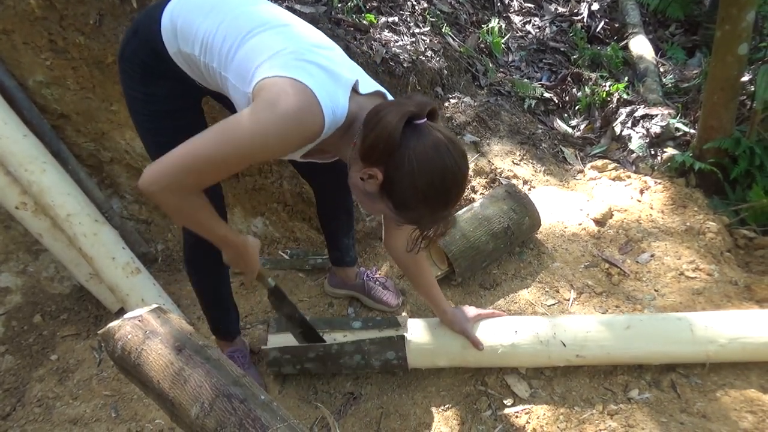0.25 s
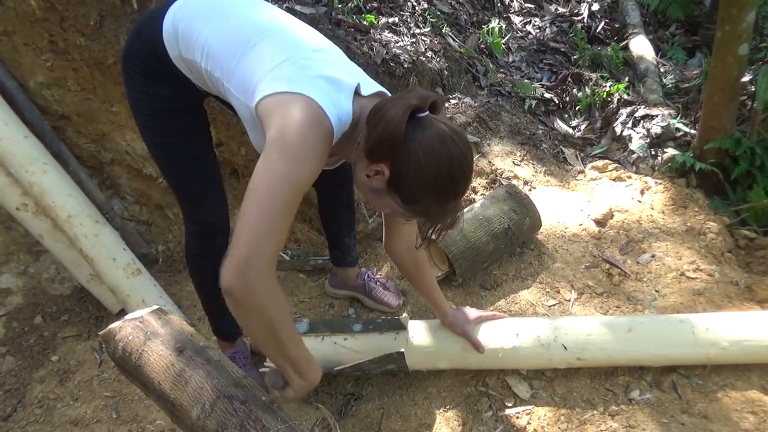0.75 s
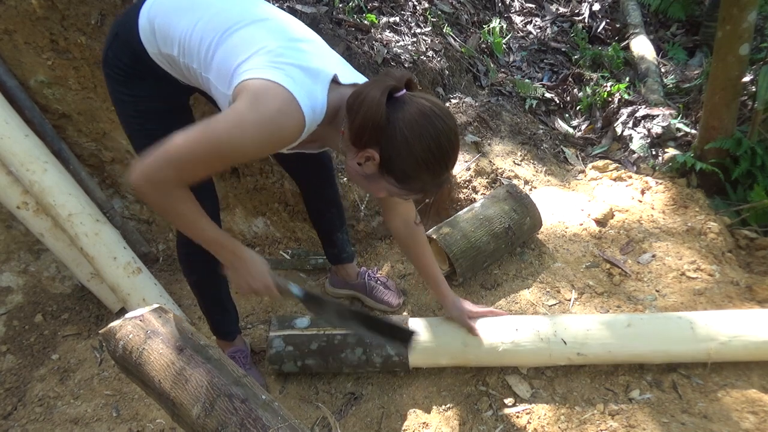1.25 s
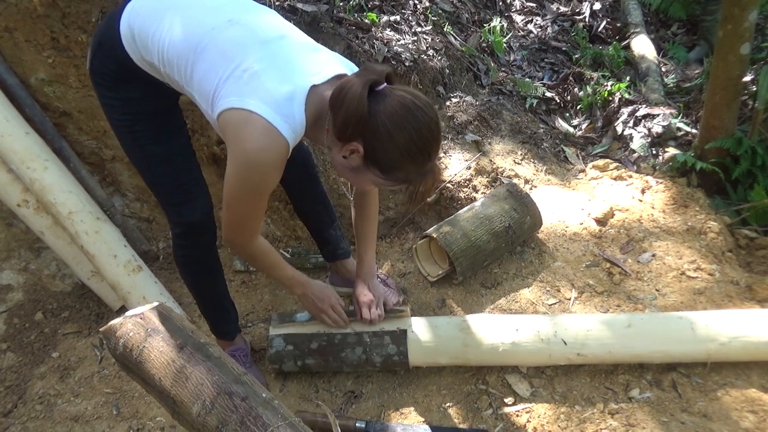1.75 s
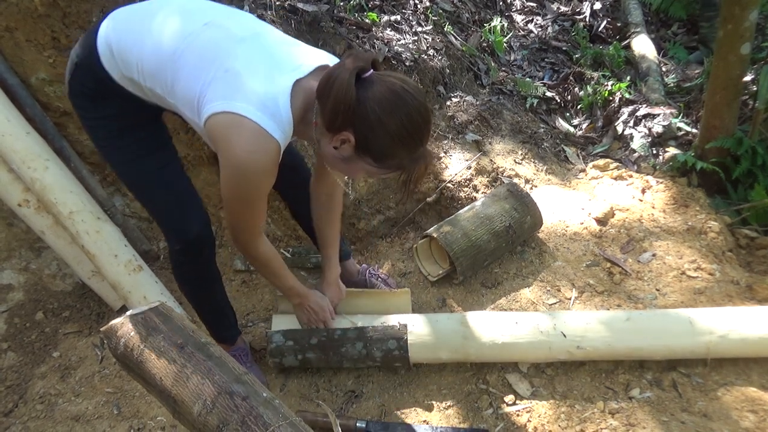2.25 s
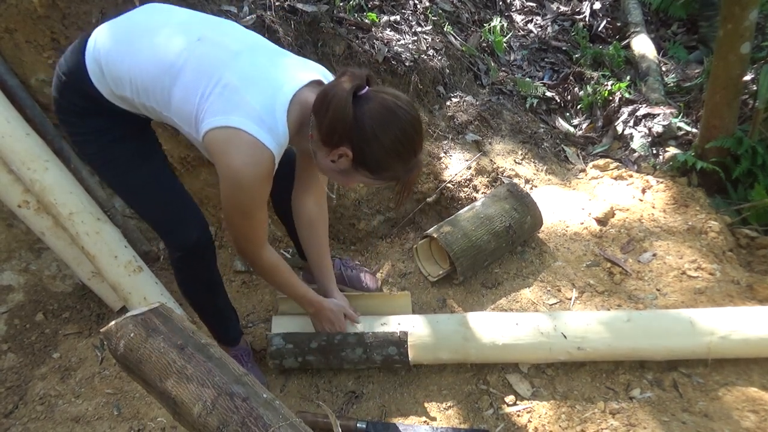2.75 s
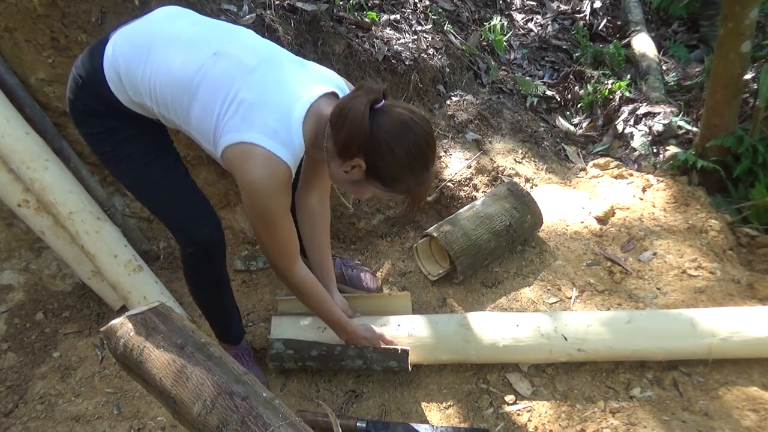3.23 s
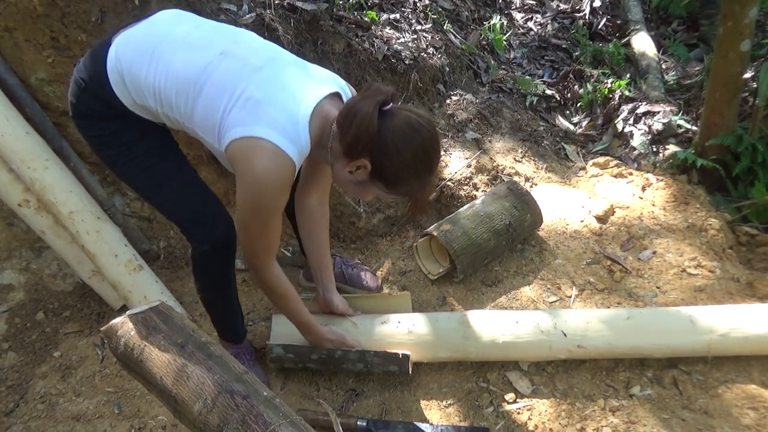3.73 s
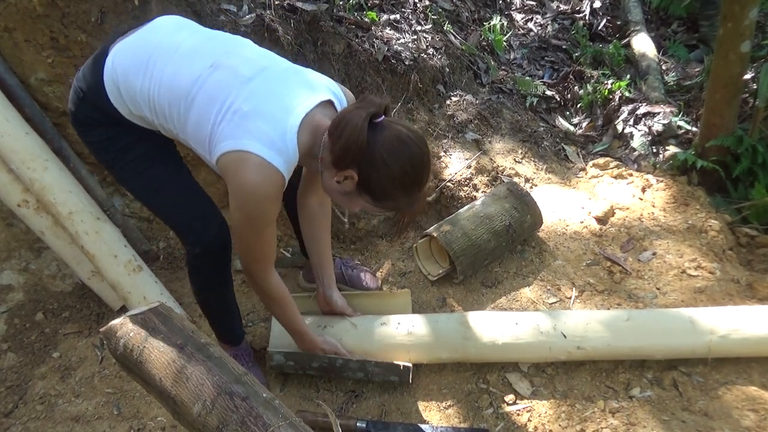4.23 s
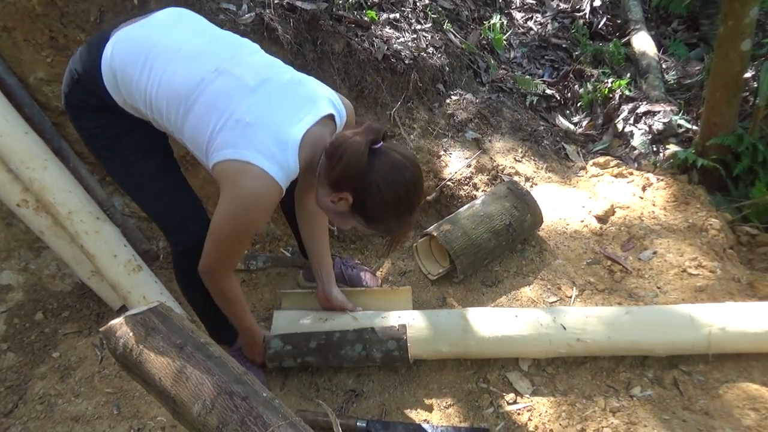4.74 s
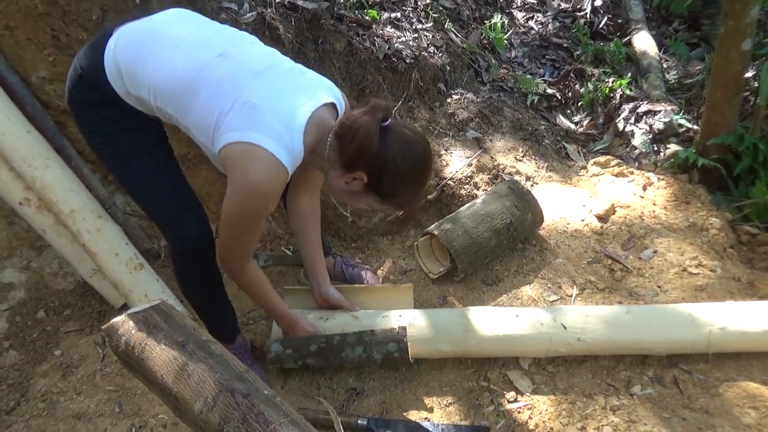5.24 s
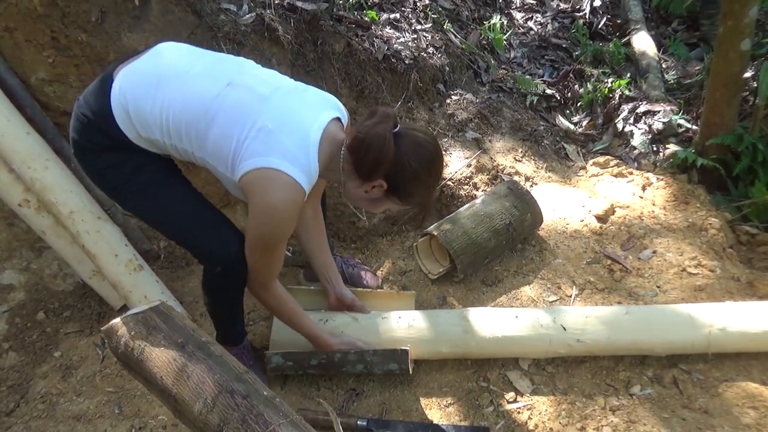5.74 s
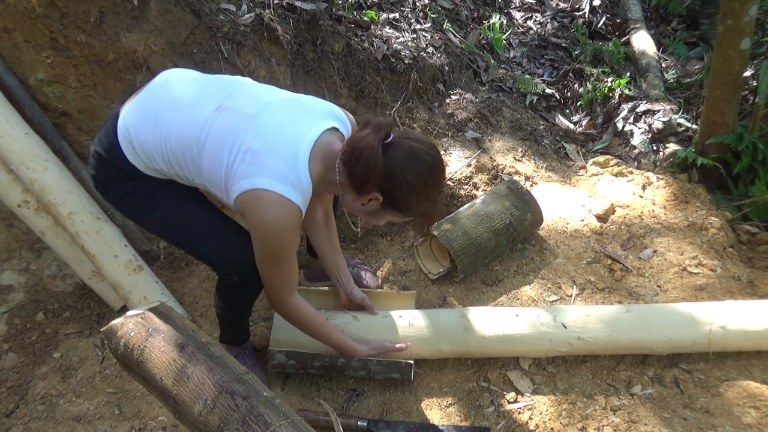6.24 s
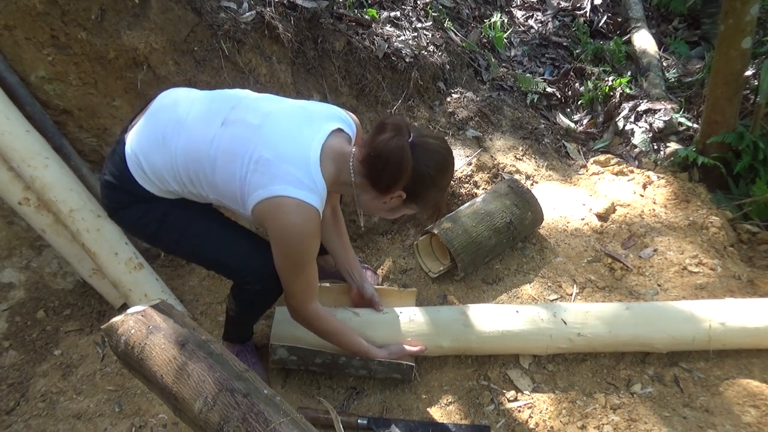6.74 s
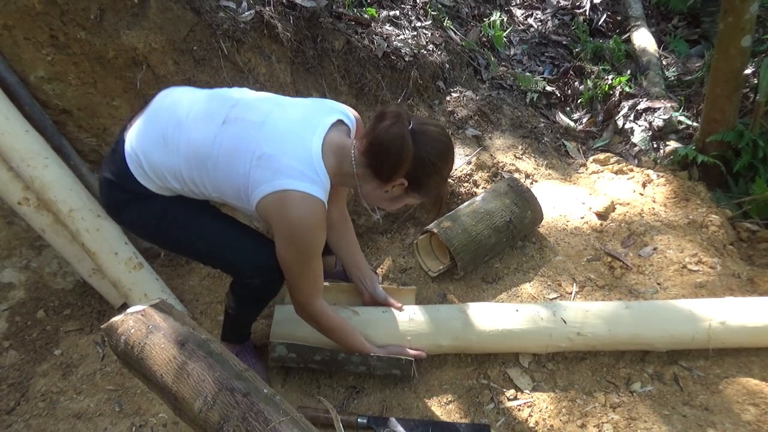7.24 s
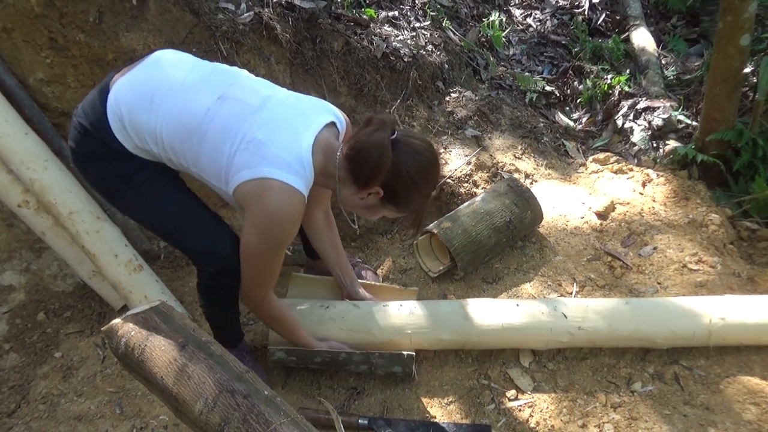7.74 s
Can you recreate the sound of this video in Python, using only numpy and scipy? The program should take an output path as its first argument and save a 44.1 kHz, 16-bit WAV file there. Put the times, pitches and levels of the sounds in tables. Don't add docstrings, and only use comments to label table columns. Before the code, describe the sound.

Close to a fresh log in a forest clearing, a blade rubs under bark, hisses free and drops with a bright metallic clatter. Hands then pull the bark: fibres crackle, rasp in short bursts, rip in a sharp double jolt and snap hard, with hollow knocks. Faint insects, leaves and far bird peeps sit behind. Small camera microphone, nearly mono, dry and bright.

```python
import sys
import numpy as np
from scipy import signal
from scipy.fft import rfft, irfft, next_fast_len
from scipy.io import wavfile
from scipy.ndimage import uniform_filter1d, map_coordinates

SR = 44100
rng = np.random.default_rng(int(sys.argv[2]) if len(sys.argv) > 2 else 0)


def ratio_of_db(decibels):
    return 10 ** (np.asarray(decibels, float) / 20)


def dump(signal):
    limited = np.clip(np.atleast_2d(signal).T, -1, 1)
    pcm = np.round(limited * 32767).astype(np.int16)
    wavfile.write(sys.argv[1], SR, pcm)


N = 351904


def peeling():
    # (frequency [Hz], level [dB])
    fibre_curve = [(300, -70), (3000, -16), (4300, -12), (5500, -4), (6500, 1.5), (8500, 0.5),
                   (11000, -1.5), (13000, -5), (15500, -12), (17000, -37)]
    # (start [s], end [s], centre [Hz], width [Hz], level [dB])
    hollows = [(0, 0.765, 2640, 120, 0.5), (0.187, 0.283, 5570, 1500, 12), (2.87, 3.12, 6200, 1510, 10.5),
               (2.776, 3.183, 1170, 392, 7.5), (3.41, 3.888, 1135, 395, 7), (2.84, 3.898, 666, 139, -4),
               (2.81, 3.596, 2438, 303.1, -4.5), (4.15, 4.723, 1980, 413, -0.5),
               (4.185, 4.584, 1090, 220, 5), (5.15, 5.638, 785, 348, -1.5), (5.152, 5.65, 2620, 250, -2.5),
               (5.2, 6.71, 1250, 199, -9), (5.7, 6.307, 580, 150, -1), (5.976, 6.28, 2440, 120, 7),
               (6.378, 6.926, 1965, 260, 5), (6.762, 6.94, 5100, 500, 7), (6.925, 7.973, 625, 120, 9.5),
               (7.306, 7.598, 1614, 402.9, -3)]
    # (start [s], peak [s], end [s], rasp [dB], bark body over rasp [dB])
    sweeps = [(-.06, .003, 0.064, -46.5, -6.5), (.36, .39, 0.46, -55.5, 4), (.53, .58, 0.69, -44.5, -4),
              (.57, .69, .79, -42, -7.5), (3.08, 3.17, 3.25, -36.5, -9), (3.41, 3.52, 3.593, -32, -9),
              (3.66, 3.72, 3.75, -40.5, -13), (3.73, 3.87, 3.94, -34.5, -9.5),
              (3.89, 3.95, 3.98, -45.5, -7.5), (4.04, 4.075, 4.18, -40.5, -13),
              (4.14, 4.27, 4.443, -37.5, -9.5), (4.4, 4.43, 4.4, -40.5, -12),
              (4.5, 4.55, 4.69, -47.5, -1.5), (5.16, 5.29, 5.4, -46.5, -1), (5.44, 5.53, 5.6, -36.5, -5.5),
              (5.67, 5.77, 5.93, -40.5, -9), (6.14, 6.175, 6.205, -33, -11),
              (6.49, 6.507, 6.57, -37.5, -13.5), (6.73, 6.87, 6.96, -39, -17),
              (7.77, 7.93, 8.17, -38.5, -13.5)]
    # (start [s], peak [s], end [s], rasp [dB], bark body over rasp [dB])
    pushes = [(.13, .22, 0.69, -58, -5), (.8, .86, 0.97, -60.5, 4), (1.48, 1.74, 2.09, -54, -1.5),
              (2.12, 2.38, 2.45, -55.5, 4), (2.4, 2.6, 2.77, -54.5, -0.5), (2.78, 2.91, 3.03, -40, -5.5),
              (2.91, 3.03, 3.23, -39, -8.5), (3.3, 3.37, 3.1, -51.5, -3.5), (4.62, 4.85, 5.5, -63, 2),
              (5.33, 5.43, 5.64, -45, -4.5), (5.54, 5.61, 5.78, -42.5, -6.5), (5.88, 6.06, 6.25, -42, -9),
              (6.12, 6.25, 6.71, -42, -8), (6.55, 6.645, 6.94, -39.5, -12), (6.93, 6.968, 7.035, -35, -12),
              (7.0, 7.03, 7.08, -55, -12), (7.32, 7.36, 7.55, -42, -15), (7.39, 7.58, 8.06, -42, -12.5)]
    # (start [s], peak [s], end [s], rasp [dB], bark body over rasp [dB])
    jolts = [
        (4.46, 4.478, 4.487, -20.5, -17),
        (4.487, 4.502, 4.507, -16.5, -16),
        (4.45, 4.49, 4.525, -26, -8),
    ]

    rows = blended(np.concatenate([
        strokes(sweeps, squareness=1.74, air_db=-4.5, gained_db=0.92),
        strokes(pushes, squareness=2.32, air_db=-7.5, gained_db=1.5),
        strokes(jolts, squareness=1.1, air_db=-5, gained_db=.3)], axis=1))
    friction = grit(rate=4000, spread_db=1.5, share=0.62)
    hz, t, z = signal.stft(friction, SR, nperseg=512, noverlap=384)
    _, air_db, body_db = curves(rows, t)
    f = hz[:, None]

    top_tilt = np.clip((f - 8500) / 4500, -.3, 1.3)
    rasp = ratio_of_db(along(fibre_curve, f) + (air_db + 7) * top_tilt)

    body = .36 * np.abs(resonance(f, 1400, 3400)) ** 2
    for start, end, centre_hz, width, db in hollows:
        held = np.clip(np.minimum(t - start, end - t) / 0.019, 0, 1)
        body = body + held * ratio_of_db(db - 6.5) * np.abs(resonance(f, centre_hz, 1.04 * width)) ** 3.6

    patches = uniform_filter1d(rng.standard_normal(z.shape), size=10, axis=0)
    patches = unit(uniform_filter1d(patches, size=14, axis=1))
    gain = np.hypot(rasp, ratio_of_db(body_db + 9) * body) * ratio_of_db(1.72 * patches + 4)
    sound = signal.istft(z * gain, SR, nperseg=512, noverlap=384)[1][:N]
    level_db = curves(rows, np.arange(N) / SR)[0]
    return sound * ratio_of_db(level_db + 1.15 * wobble(40))


def snaps():
    # (time [s], peak [dB], knock over crack [dB], crack [Hz], knock [Hz])
    thick = [(0.383, -27.5, -14, 7940, 1540), (1.8698, -35, -4, 9240, 2700),
             (2.1647, -25.5, -15, 9100, 1350), (2.172, -26, -16, 7050, 647), (2.2084, -18, -8, 5200, 1280),
             (2.232, -22.5, -10, 9000, 950), (2.2438, -21.5, -13, 6600, 724),
             (2.2694, -23.5, -11, 6640, 800), (2.3484, -24, -16, 12600, 1180), (2.36, -9, -14, 6600, 2240),
             (2.3664, -23, -15, 6700, 1620), (4.4752, -14, -13.5, 11600, 1920),
             (5.3849, -28, -4.5, 7870, 800.5), (5.5413, -3.5, -23, 12100, 980),
             (6.9368, -11.5, -17.5, 6500, 1890), (6.9434, -15, -15, 6430, 670),
             (7.9354, -21, -19, 8800, 1910)]
    # (time [s], peak [dB], knock over crack [dB])
    thin = [(0.21, -38.5, -9), (0.3984, -35, -23), (0.4284, -29, -33), (1.8916, -33, -21),
            (1.957, -34, -14), (1.9904, -30, -11), (2.1131, -29, -30), (2.216, -26, -17),
            (2.3171, -42, -30), (2.3391, -31, -22), (2.3553, -23, -17), (3.7179, -23, -21),
            (4.0517, -29, -17.5), (5.2919, -25, -12.5), (5.4964, -28, -15), (6.9385, -10, -19),
            (7.0714, -48, -27), (7.1417, -41, -21), (7.3407, -35, -23)]
    # (frequency [Hz], width [Hz], level [dB])
    bark_modes = [(650, 230, 2.5), (1180, 600, 1), (2000, 690, -8), (3460, 2300, -23)]
    thin_crack_hz, thin_knock_hz, spread = 8860, 960, 0.087

    out = np.zeros(N)
    t = np.arange(SR // 12) / SR
    after = t - .0009
    onset = np.argmax(after >= 0)
    tail = .3 * ratio_of_db(-60 * after / .003) + .1 * ratio_of_db(-60 * after / .02) + .012 * ratio_of_db(-60 * after / .15)
    shape = np.where(after < 0, .04, tail)
    pitches = [thin_crack_hz, thin_knock_hz] * np.exp(spread * rng.standard_normal((len(thin), 2)))
    fibres = thick + [(*row, *hz) for row, hz in zip(thin, pitches)]

    for s, db, knock_db, crack_hz, knock_hz in fibres:
        burst = rng.standard_normal(len(t)) * shape
        burst[onset] = 1.12
        crack = filtered(burst, lambda f: 1.03 * resonance(f, crack_hz, 2800) ** 2
                         + 0.6 * resonance(f, 9400, 8600) ** 3)
        push = rng.standard_normal(len(t)) * ratio_of_db(-60 * after / 0.019) * (after >= 0)
        push[onset] = 4
        own = 0.57 * np.sign(900 - knock_hz)
        knock = filtered(push, lambda f: 0.56 * bank(bark_modes)(f)
                         + own * resonance(f, knock_hz, 0.34 * knock_hz))
        crack = crack / np.abs(crack).max()
        knock = knock / np.abs(knock).max()
        add(out, s, ratio_of_db(db) * (crack + ratio_of_db(knock_db) * knock))
    return out


def machete():
    # (time [s], ring [dB], crack [dB], body clack over crack [dB], mode struck best [Hz])
    contacts = [(.964, -48, -44, -15, 9225), (.976, -43, -50, -5, 5070), (0.994, -37, -50, -15, 5070),
                (1.02, -49, -45, -15, 7100), (1.027, -37.5, -50, -15, 4465), (1.031, -35.5, -45, -15, 8280),
                (1.5025, -25.5, -9.5, -6.5, 7100), (1.51, -36, -28, -8, 5922),
                (1.509, -30.5, -33, -14, 8280), (1.5344, -42, -27, -10, 6650),
                (1.557, -30.5, -25, -3, 5070), (1.5636, -29, -31, 4, 7100), (1.5819, -29, -19.5, 1.5, 5922),
                (1.5982, -28.5, -19, -7, 5922), (1.6, -47, -40, -11, 8280), (1.542, -46, -27, -1, 11780),
                (1.578, -52, -29, -1, 9225), (1.594, -44, -27, 5, 11050), (1.6523, -50, -33, -2, 8280),
                (1.668, -46, -29.5, 2.5, 13780), (1.705, -48, -33, 0, 13780), (1.7008, -61, -29, -12, 7100),
                (1.72, -35, -21.5, -29, 8280)]
    # (frequency [Hz], level [dB], t60 [s])
    steel_modes = [(680, -14.5, 0.19), (2590, -12, 0.087), (3050, -17, 0.058), (3810, -12.5, 0.053),
                   (4465, -8.5, 0.11), (5070, -12, 0.058), (5750, -26, 0.028), (5922, -3, 0.13),
                   (6650, -5, 0.064), (7100, 3, 0.034), (8040, -2, 0.02), (8280, -4, 0.13),
                   (9225, -12, 0.051), (9750, -7, 0.031), (11050, 1.5, 0.032), (11780, -7, 0.045),
                   (12610, -5, .04), (13780, -6, .04), (15300, -12, .03)]
    # (start [s], peak [s], end [s], scrape [dB], wood over scrape [dB])
    draws = [
        (.94, 1.0, 1.069, -38.5, -16.5),
        (1.0, 1.028, 1.047, -30, -26),
    ]

    out = np.zeros(N)
    t = np.arange(SR // 6) / SR
    for s, ring_db, crack_db, clack_db, best_hz in contacts:
        ring = np.zeros(len(t))
        for hz, level, t60 in steel_modes:
            best = abs(hz / best_hz - 1) < .06
            mode_db = 0 if best else level - 7 + rng.normal(0, 5.1)
            drift = 0.018 * np.cumsum(rng.standard_normal(len(t)))
            ring += ratio_of_db(mode_db - 60 * t / t60) * np.sin(2 * np.pi * hz * t + drift)
        decay = ratio_of_db(-60 * t / .013) + .2 * ratio_of_db(-60 * t / .05)
        noise = rng.standard_normal(len(t)) * decay * (1 - np.exp(-t / .0005))
        crack = filtered(noise, lambda f: resonance(f, 8800, 8600) ** 2
                         + ratio_of_db(clack_db + 3.5) * resonance(f, 1570, 2100))
        ring *= 1 - np.exp(-t / 0.00035)
        add(out, s, ratio_of_db(ring_db) * ring + ratio_of_db(crack_db - 4.5) * crack)

    scrape_db, _, wood_db = curves(blended(strokes(draws, squareness=1.6)), np.arange(N) / SR)
    rub = grit(rate=3300, spread_db=-3, share=1.0) * ratio_of_db(scrape_db)
    damped = [(hz, 110, level * .4) for hz, level, _ in steel_modes[5:14]]
    steel = filtered(rub, lambda f: ratio_of_db(10) * bank(damped)(f) + 2.1 * resonance(f, 7300, 3700) ** 2)
    wood = filtered(rub * ratio_of_db(wood_db + 16.5), lambda f: resonance(f, 1470, 750))
    return out + steel + wood


def knocks():
    # (time [s], peak [dB], frequency [Hz], t60 [s])
    thumps = [(1.504, -29.5, 457, 0.02), (1.504, -34.5, 130, 0.058), (1.503, -33.5, 280, 0.029),
              (1.576, -36.5, 268, 0.1), (1.586, -27, 208, 0.044), (1.658, -41, 141, 0.068),
              (1.7, -43, 162, 0.07), (2.492, -39, 720, 0.013), (2.56, -41, 327, .03),
              (2.562, -48.5, 624, 0.051), (4.475, -35, 225, .03), (4.478, -44, 42, .09),
              (5.155, -46.5, 650, 0.024), (5.541, -30, 637, 0.042), (5.539, -37.5, 158, 0.039),
              (5.928, -47, 880, 0.027), (6.938, -29, 677, 0.031), (6.941, -23, 262, 0.026),
              (6.434, -43, 3050, .01)]
    # (time [s], peak [dB], frequency [Hz])
    rattles = [
        (1.576, -36, 1740),
        (1.592, -37, 2280),
        (1.6352, -40, 1820),
        (1.6514, -47, 2000),
        (1.67, -43, 2000),
        (1.6853, -40.5, 2030),
        (1.711, -42.5, 1820),
        (2.4752, -50, 1660),
    ]
    out = np.zeros(N)
    t = np.arange(SR // 10) / SR
    for s, db, hz, t60 in thumps + [(*row, .017) for row in rattles]:
        drift = np.cumsum(rng.standard_normal(len(t))) * .00006 * hz
        swing = np.sin(2 * np.pi * hz * t + drift) * (1 - np.exp(-t * hz))
        add(out, s, ratio_of_db(db + 7.0 - 60 * t / max(t60, .005)) * swing)
    return out


def forest():
    # (frequency [Hz], width [Hz], level [dB])
    chorus = [
        (7340, 80, -65.5),
        (7120, 440, -67),
        (7810, 1900, -64),
    ]
    # (time [s], level [dB])
    near_insect = [
        (0, -65),
        (.45, -62),
        (.6, -100),
        (4.5, -89),
        (4.65, -63),
        (5.25, -77),
        (5.4, -76),
        (8, -78),
    ]
    # (time [s], length [s], frequency [Hz], level [dB])
    peeps = [
        (0.266, 0.084, 3330, -67),
        (0.857, 0.1, 3330, -64),
        (1.375, .025, 6450, -55.5),
        (1.393, 0.094, 3330, -65),
        (2.1, .07, 3420, -65),
        (4.813, 0.073, 6100, -60),
        (4.844, 0.14, 3400, -70),
    ]
    t = np.arange(N) / SR
    out = air()
    for hz, width, db in chorus:
        out += ratio_of_db(db + 0.98 * wobble(3.56) + 1.6 * wobble(90)) * buzz(hz, width)
    out += ratio_of_db(curves(near_insect, t)[0]) * buzz(7680, 90)
    for s, length, hz, db in peeps:
        u = np.clip((t - s) / length, 0, 1)
        cycles = hz * length * (1.03 * u - 0.0296 * u ** 2)
        voice = np.sin(2 * np.pi * cycles + 0.72 * wobble(150))
        out += ratio_of_db(db + 1.5 * wobble(67.7)) * np.sin(np.pi * u) ** .5 * voice
    return out


def buzz(hz, width):
    return unit(filtered(rng.standard_normal(N), lambda f: resonance(f, hz, width) ** 2))


def air():
    # (frequency [Hz], level [dB])
    air_curve = [(12, -52), (20, -26.5), (88, -3), (200, -3), (363, -5), (600, -12), (1200, -13),
                 (1900, -18), (3100, -20.5), (6000, -20), (9000, -25), (15600, -27)]
    noise = unit(filtered(rng.standard_normal(N), lambda f: ratio_of_db(along(air_curve, f))))
    return ratio_of_db(-57 + 0.22 * wobble(1.92)) * noise


def grit(rate, spread_db, share):
    breaks = rng.random(N) < rate / SR * ratio_of_db(4 * wobble(60))
    sizes = ratio_of_db(np.minimum(spread_db * rng.exponential(size=N), 9)) * rng.standard_normal(N)
    flutter = rng.standard_normal(N) * ratio_of_db(1.34 * wobble(250))
    return unit(flutter + share * unit(breaks * sizes))


def strokes(rows, squareness, air_db=0, gained_db=0):
    edge_db, body_keeps = 15.5, 0.24
    start, peak, end, db, body_db = np.transpose(rows)[:, :, None]
    t = np.arange(0, N / SR + .02, .001)
    rise = (t - peak) / np.maximum(peak - start, .002)
    fall = (t - peak) / np.maximum(end - peak, .002)
    u = np.where(t < peak, rise, fall)
    fall_db = np.minimum(edge_db * np.abs(u) ** squareness, 90)
    air = air_db + gained_db * np.clip(u, -1, 1)
    return np.array([db - fall_db, air, body_db + body_keeps * np.minimum(fall_db, 20)])


def blended(controls):
    power = ratio_of_db(2 * controls[0])
    total = power.sum(axis=0)
    colour = (controls[1:] * power).sum(axis=1) / total
    clock = np.arange(power.shape[1]) * .001
    return np.array([clock, 10 * np.log10(total), *colour]).T.tolist()


def unit(x):
    return x / np.sqrt(np.mean(x ** 2) + 1e-20)


def along(points, hz):
    f, v = np.transpose(points)
    return np.interp(np.log(hz + 1), np.log(f + 1), v)


def curves(rows, t):
    s, level, *cols = np.transpose(sorted(rows))
    return [np.interp(t, s, level, -120, -120)] + [np.interp(t, s, c) for c in cols]


def wobble(rate):
    knots = rng.standard_normal(int(N * rate / SR) + 4)
    return map_coordinates(knots, [np.arange(N) * rate / SR])


def filtered(x, response):
    m = next_fast_len(x.shape[-1] + 2048)
    return irfft(rfft(x, m) * response(np.fft.rfftfreq(m, 1 / SR)), m)[..., :x.shape[-1]]


def resonance(f, hz, width):
    return 1j * f * width / (hz * hz - f * f + 1j * f * width)


def bank(modes):
    return lambda f: sum((-1) ** k * ratio_of_db(db) * resonance(f, c, w) for k, (c, w, db) in enumerate(modes))


def add(track, s, sound):
    part = track[round(s * SR):][:len(sound)]
    part += sound[:len(part)]


def scene():
    # (frequency [Hz], level [dB])
    port_difference = [(60, -24), (300, -14.5), (900, -16.5), (2000, -18), (5000, -20.5), (6300, -12),
                       (7400, -6), (8600, -12), (12000, -22)]
    work = peeling() + snaps() + knocks() + machete()
    scatter = rng.standard_normal(600) * ratio_of_db(-60 * np.arange(600) / 700)
    scatter = irfft(np.exp(1j * np.angle(rfft(scatter))))
    side = ratio_of_db(-28) * signal.fftconvolve(work, scatter / np.linalg.norm(scatter))[:N]
    side += filtered(air(), lambda f: ratio_of_db(along(port_difference, f)))
    mid = work + forest()
    return np.array([mid + side, mid - side]) * ratio_of_db([[.12], [-.12]])


def band_limit(x):
    return signal.sosfilt(signal.butter(12, 16780, fs=SR, output="sos"), x)


def record(dry):
    def treble_limit(f):
        return ratio_of_db(-20 * np.clip((f - 15850) / 120, 0, 1)) * (f < 16780)
    mix = filtered(dry, treble_limit)
    return band_limit(mix)


dry = scene()
out = record(dry)
dump(out)
```